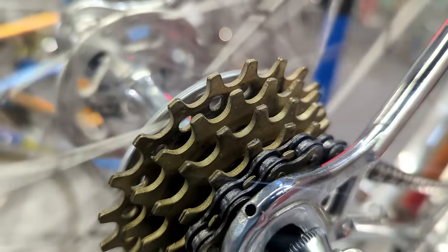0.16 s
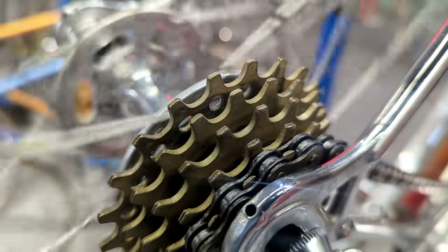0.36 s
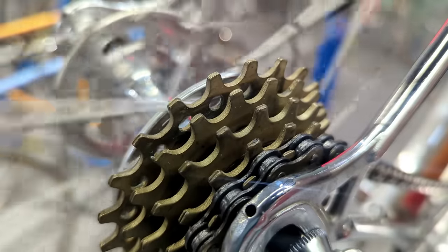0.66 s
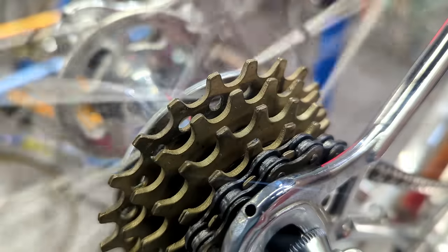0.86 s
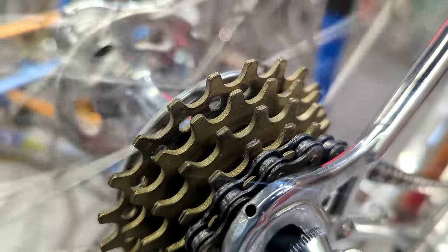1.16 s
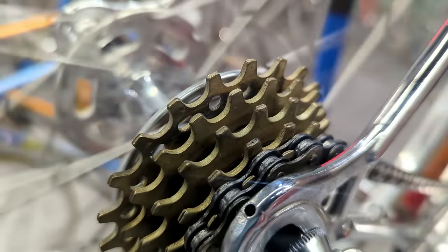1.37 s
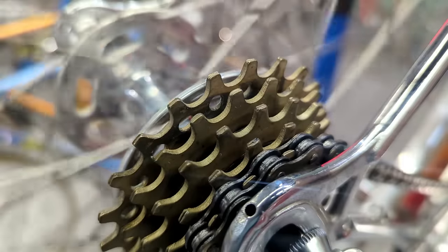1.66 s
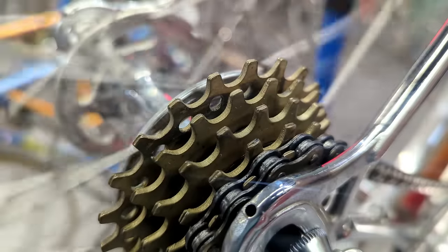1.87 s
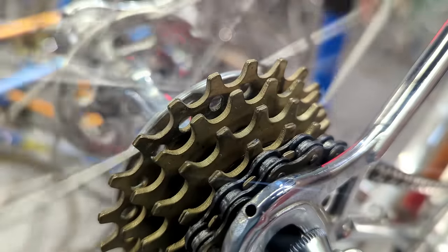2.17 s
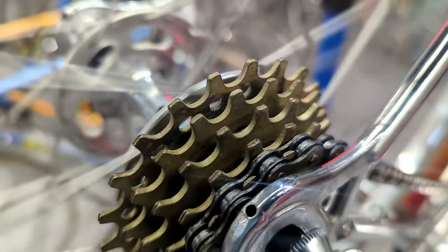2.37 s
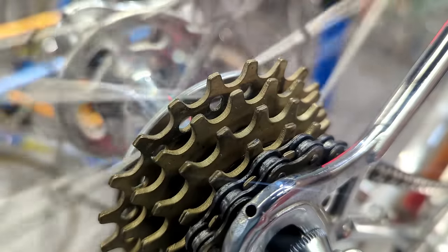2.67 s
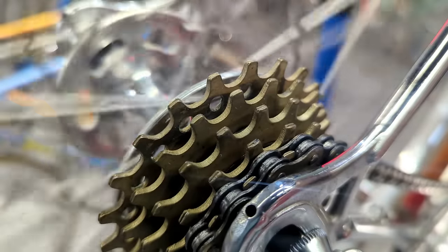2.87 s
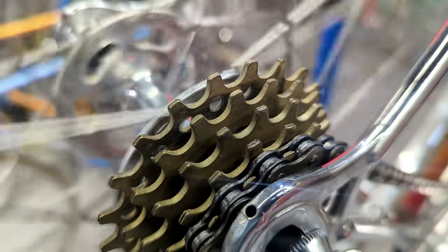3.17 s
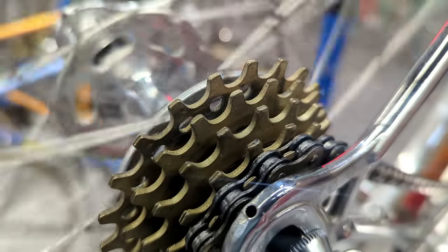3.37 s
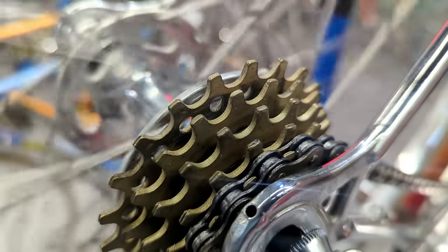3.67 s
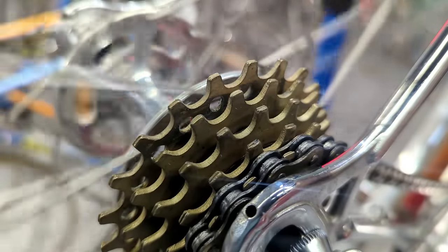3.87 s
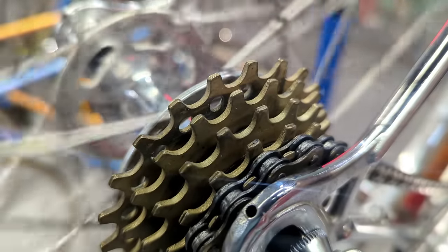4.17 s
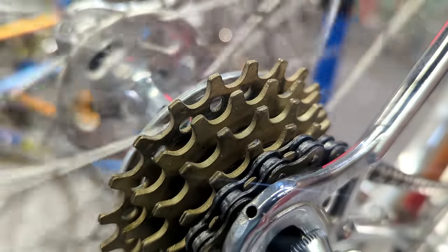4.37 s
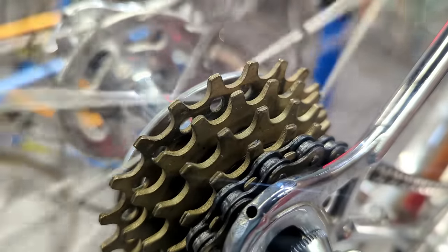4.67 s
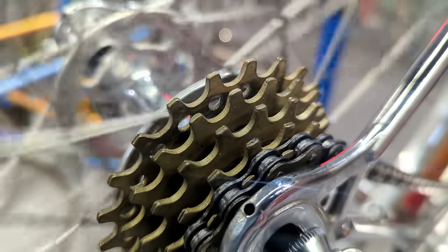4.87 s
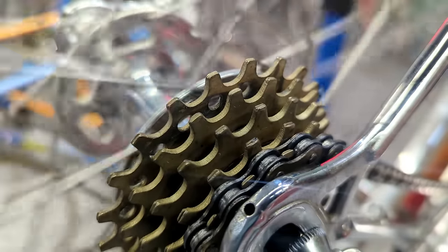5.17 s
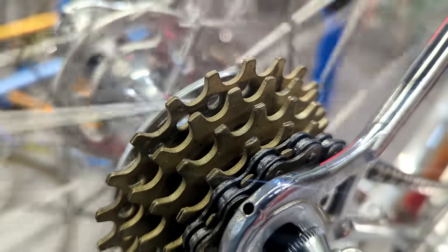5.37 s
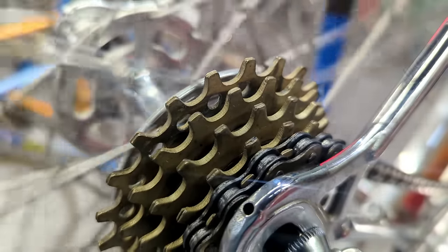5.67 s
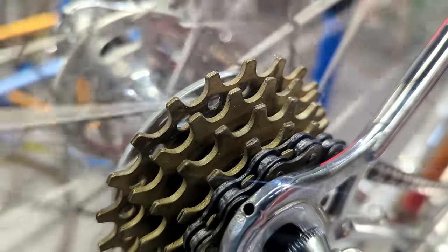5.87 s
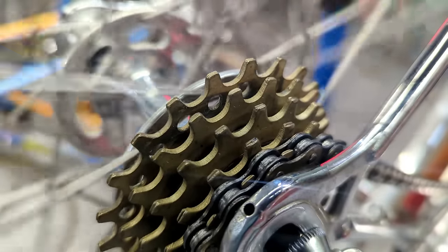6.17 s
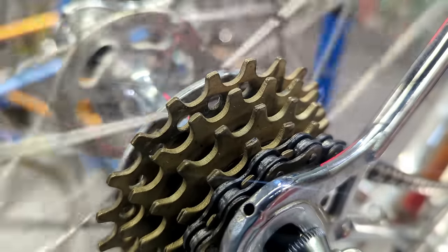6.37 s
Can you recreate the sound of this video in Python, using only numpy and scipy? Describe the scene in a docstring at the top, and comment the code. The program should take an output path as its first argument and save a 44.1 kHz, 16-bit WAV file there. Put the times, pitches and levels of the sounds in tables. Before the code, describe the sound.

A bicycle freewheel coasts very close to the microphone. Two pawls drop alternately on ratchet teeth, giving a rapid, slightly limping stream of thin, bright steel clicks, each with a tiny chatter and high sprocket ring. The rate eases steadily from start to finish. Soft bearing rustle and a hollow hub murmur lie underneath, with a short diffuse workshop echo and very faint low hum.

```python
"""Quick metallic ticking, close by, slows gently: a bicycle wheel coasts on a stand beside its listener.
Two pawls drop in turn off a 21-tooth ratchet; each lands, chatters and rings the steel sprockets.
Filtered noise makes the bearings' rustle and drives resonances of the hollow hub underneath.
The workshop adds a short diffuse echo, room air, a faint hum that comes and goes and a fainter drone."""
import sys
import numpy as np
from scipy import signal
from scipy.fft import rfft, irfft, next_fast_len
from scipy.io import wavfile
from scipy.ndimage import uniform_filter1d, map_coordinates

SR = 44100
rng = np.random.default_rng(int(sys.argv[2]) if len(sys.argv) > 2 else 0)


def unload_audio(sound):
    """Save the sound as a 16-bit wav file, at the path given as the first command line argument."""
    columns = np.transpose(np.atleast_2d(sound))
    # keep every value between -1 and 1, then stretch to whole-number steps
    steps = np.round(np.clip(columns, -1, 1) * 32767)
    wavfile.write(sys.argv[1], SR, steps.astype(np.int16))


N = 287179
TOOTH_COUNT = 21  # teeth in one turn


def amp(db):
    """Decibels to gain."""
    return 10 ** (np.asarray(db) / 20)


def unit(x):
    """Scale to rms 1."""
    return x / np.sqrt(np.mean(x ** 2) + 1e-20)


def along(points, hz):
    """(Hz, value) points read on a log frequency axis."""
    f, v = np.transpose(points)
    return np.interp(np.log(hz + 1), np.log(f + 1), v)


def curves(rows):
    """One value per sample for each column after the time."""
    time_s, *columns = np.transpose(rows)
    return [np.interp(np.arange(N) / SR, time_s, column) for column in columns]


def wobble(knots_per_s):
    """A smooth random curve through normally distributed knots."""
    knots = rng.standard_normal(int(N * knots_per_s / SR) + 4)
    coarse = np.linspace(0, N, 4000)
    smooth = map_coordinates(knots, [coarse * knots_per_s / SR])
    return np.interp(np.arange(N), coarse, smooth)


def filtered(x, response):
    """x times a response of frequency, zero-padded."""
    size = 2 * next_fast_len(N // 2 + SR // 4)
    spectrum = rfft(x, size) * response(np.fft.rfftfreq(size, 1 / SR))
    return irfft(spectrum, size)[..., :N]


def causal(gain):
    """The minimum-phase response with this gain: it rings only after a blow."""
    cepstrum = irfft(np.log(np.maximum(gain, 1e-6)))
    half = len(cepstrum) // 2
    fold = np.r_[1, np.full(half - 1, 2), 1, np.zeros(half - 1)]
    return np.exp(rfft(cepstrum * fold))


def noise():
    """White stereo noise; the shares of mid and side set the left-right likeness at each frequency."""
    # (frequency [Hz], left-right correlation [-1 to 1])
    likeness = [(60, 0.46), (150, 0.62), (300, 1), (600, -0.032), (1200, 0.2), (2500, -0.31), (5000, -0.26),
                (9000, -0.15), (14000, -0.11)]

    def angle(hz):
        """Mixing angle [rad] between mid and side."""
        return np.arccos(np.clip(along(likeness, hz), -1, 1)) / 2

    a, b = rng.standard_normal((2, N))
    mid = filtered(a, lambda hz: np.cos(angle(hz)))
    side = filtered(b, lambda hz: np.sin(angle(hz)))
    return np.array([mid + side, mid - side])


def body(x, spectrum):
    """Pass x through the broad colour of the metal."""
    return filtered(x, lambda hz: causal(amp(along(spectrum, hz))))


def ringing(drive, modes, vary_db):
    """Resonances fed by a noisy force; each wavers in strength and radiates in its own stereo pattern."""
    out = np.zeros((2, N))
    for f_hz, width_hz, db, pan_db, phase_rad in modes:
        force = drive * rng.standard_normal(N) * amp(vary_db * wobble(50))
        ring = signal.lfilter(*signal.iirpeak(f_hz, f_hz / width_hz, SR), force)
        quarter_turn = np.gradient(ring) / np.sin(2 * np.pi * f_hz / SR)
        for channel, side in enumerate((1, -1)):
            turned = np.cos(phase_rad / 2) * ring + side * np.sin(phase_rad / 2) * quarter_turn
            out[channel] += amp(db + side * pan_db / 2) * turned
    return out


def tone(hz, drift_hz):
    """A slightly unsteady sine of rms 1."""
    return unit(np.sin(2 * np.pi * np.cumsum(hz + drift_hz * wobble(3)) / SR))


def background():
    """Room air, a low hum that comes and goes and a fainter, slowly sinking drone above it."""
    # room air: (frequency [Hz], spectral level [dB])
    air_spectrum = [(20, -20), (40, -9), (58, -2), (100, -3), (180, -11), (400, -8.5), (2000, -47),
                    (15000, -50)]
    # swells of the hum: (start [s], length [s], level [dB])
    hum_swells = [(.3, .17, -70), (.7, .1, -72), (1.42, .19, -69.5), (2.15, .1, -73), (3.25, .35, -71),
                  (5.96, .6, -65)]
    # drone: (time [s], level [dB])
    drone_level = [(0, -86), (2.2, -87), (2.9, -74.5), (4.1, -81), (6.51, -83)]
    hum_rest_db, hum_waver_db, swell_fade_s = -83, 4, .12
    drone_start_hz, drone_sag_hz_per_s = 141, 1.2

    t = np.arange(N) / SR
    air = amp(-70.5) * unit(filtered(noise(), lambda hz: amp(along(air_spectrum, hz))))
    hum_gain = amp(hum_rest_db + hum_waver_db * wobble(6))
    for start_s, length_s, db in hum_swells:
        inside_s = np.minimum(t - start_s, start_s + length_s - t)
        swell = amp(db) * np.clip(.5 + inside_s / swell_fade_s, 0, 1)
        hum_gain = np.maximum(hum_gain, swell)
    hum = hum_gain * tone(hz=80, drift_hz=1.2)
    drone = amp(curves(drone_level)[0]) * tone(hz=drone_start_hz - drone_sag_hz_per_s * t, drift_hz=.6)
    return air + hum + drone


def workshop(x):
    """A short diffuse echo of decaying noise; the turning wheel keeps changing the paths that feed it."""
    # decay: (frequency [Hz], t60 [s])
    decay = [(200, 0.17), (3000, 0.3), (8000, 0.13), (16000, 0.11)]
    hop, length = SR // 8, SR // 3  # samples: a new echo pattern every hop
    starts = range(0, N, hop)
    hz, t, z = signal.stft(rng.standard_normal((len(starts), 2, length)), SR, nperseg=256)
    fading = z * amp(-60 * t / along(decay, hz)[:, None])
    tails = signal.istft(fading, SR, nperseg=256)[1][..., :length]
    tails = tails * (1 - np.exp(-np.arange(length) / SR / 0.001))  # 1 ms onset
    out = np.zeros((2, N + length))
    for start, tail in zip(starts, tails):
        echo = signal.fftconvolve(x[:, start:start + hop], tail / np.linalg.norm(tail[0]), axes=1)
        out[:, start:start + echo.shape[1]] += echo
    return out[:, :N]


def wheel_motion():
    """Drag slows the wheel: its speed (dB against the start) and the teeth passed, for every sample."""
    start_teeth_per_s, drag_per_s = 26.0, 0.05801  # drag: share of the speed lost per second
    speed = np.exp(-drag_per_s * np.arange(N) / SR)
    return 20 * np.log10(speed), start_teeth_per_s * (1 - speed) / drag_per_s


def bearings():
    """Rolling balls and sliding pawls rustle and sound the hollow hub, more softly as the wheel slows."""
    # balls and pawls rubbing: (frequency [Hz], spectral level [dB])
    rub_spectrum = [(60, -19), (250, -17.5), (600, -3), (1100, -4), (2500, 0), (5000, 3.5), (9000, 2.5),
                    (15700, -25.5)]
    # hub and frame: (frequency [Hz], width [Hz], level [dB], left-right [dB], left-right phase [rad])
    hub_modes = [(214, 17, -14, 7, 0.79), (282, 50, -9, -1, 0.73), (665, 85, -3, 5.5, 2.83),
                 (814, 74, 1, 1.5, 1.29)]
    # faint ring that the hub takes on as the wheel slows: (time [s], level [dB])
    hub_ring = [(0, -72), (5.2, -70), (6.51, -57)]
    rub_start_db, hub_start_db, db_per_speed_db = -43.5, -53.3, 1.6
    swell_db, swell_at_turn = 1.3, .94  # the hub swells once a turn: depth, place in the turn (0-1)

    speed_db, passed = wheel_motion()
    swell = swell_db * np.cos(2 * np.pi * (passed / TOOTH_COUNT - swell_at_turn))
    rub_db = rub_start_db + db_per_speed_db * speed_db
    hub_db = hub_start_db + db_per_speed_db * speed_db + swell
    roughness = amp(2.55 * wobble(120))
    rustle = unit(body(noise() * roughness, rub_spectrum)) * amp(rub_db)
    hollow = unit(ringing(roughness, hub_modes, vary_db=2.0)) * amp(hub_db)
    ring = unit(ringing(roughness, [(1455, 69, 0, 0, 1)], vary_db=3.0)) * amp(curves(hub_ring)[0])
    return rustle + hollow + ring


def teeth():
    """Blow dB and extra chime dB of each tooth of one turn; ordinary teeth have 0."""
    # teeth that stand out on every turn: (tooth number, blow [dB], extra chime [dB])
    odd_teeth = [(0, .5, 1.5), (4, 1, 1.5), (8, -1.4, -1.5), (10, .8, 0), (17, .5, 1.5), (19, -1.6, 0),
                 (20, 1.5, 6.5)]
    levels = np.zeros((TOOTH_COUNT, 2))
    for number, *db in odd_teeth:
        levels[number] = db
    return levels.T


def pawl(offset_teeth, tooth_db, chatter_db, chatter_s, scatter_db, crack_s):
    """Contact power of one pawl: a landing for every tooth, then a run of fading rebounds."""
    passed = wheel_motion()[1] - offset_teeth
    tooth = np.arange(np.ceil(passed[0]), passed[-1]).astype(int)
    landing_s = np.interp(tooth, passed, np.arange(N) / SR)
    blow = amp(tooth_db[tooth % TOOTH_COUNT] + scatter_db * rng.standard_normal(len(tooth)))
    shape = (len(tooth), 18)  # rebounds per landing
    delay_s = np.cumsum(0.00058 * rng.gamma(2, .5, shape), axis=1)
    settle_s = chatter_s * amp(2.4 * rng.standard_normal((len(tooth), 1)))
    rebound = amp(chatter_db + 3.5 * rng.standard_normal(shape)) * np.exp(-(delay_s / settle_s) ** 2)
    # the spring's energy is shared between the landing and its rebounds, none harder than the landing
    share = np.c_[np.ones(len(tooth)), np.minimum(rebound, 1)] ** 2
    power = blow[:, None] ** 2 * share / share.sum(axis=1, keepdims=True)
    when_s = landing_s[:, None] + np.c_[np.zeros(len(tooth)), delay_s]
    contacts = np.bincount((when_s * SR).astype(int).ravel(), power.ravel(), N)[:N]
    fade = np.exp(-1 / (crack_s * SR))
    return signal.lfilter([1 - fade], [1, -fade], contacts)


def recolour(x, patchy_db):
    """Each landing meets the tooth at a new spot, so its colour changes while its energy stays."""
    z = signal.stft(x, nperseg=128)[2]
    field = rng.standard_normal(z.shape[1:])
    field = uniform_filter1d(field, size=2, axis=0)  # over frequency
    field = uniform_filter1d(field, size=10, axis=1)  # over time
    shaded = z * amp(patchy_db * unit(field))
    shaded = shaded * np.linalg.norm(z, axis=(0, 1)) / (np.linalg.norm(shaded, axis=(0, 1)) + 1e-20)
    return signal.istft(shaded, nperseg=128)[1][:, :N]


def ratchet():
    """One pawl chatters on, the other snaps down harder and settles sooner; some teeth chime more."""
    # bare click of steel on steel: (frequency [Hz], spectral level [dB])
    click_spectrum = [(100, -43.5), (450, -33.5), (1000, -26.5), (1700, -19.5), (2050, -16), (2400, -17.5),
                      (3000, -16.5), (3700, -10), (5300, -9), (7000, -7.5), (10000, -2.5), (13500, -3.5),
                      (15700, -4.5)]
    # sprockets: (frequency [Hz], width [Hz], level [dB], left-right [dB], left-right phase [rad])
    sprocket_modes = [(5780, 100, -4, 0, .5), (6220, 120, -1, -2, 2), (6420, 110, -4, -3, 2.5),
                      (7490, 280, -1, 5, 1.5), (8600, 240, 3.5, 2, .8), (8780, 200, -2, 0, 1.2),
                      (9120, 150, -3, 5, 2.2), (10020, 260, -2, -1, 1), (10680, 180, -3, 0, -1.5),
                      (14700, 390, -1, 1, 1), (11050, 75, 7, 1, -1.2), (11265, 75, 4.5, 3, -1),
                      (11630, 110, 3, 2, -2.2), (11960, 300, -4, 2, .5)]
    clicks_db, chime_rms_db = -26.3, -42.5
    first_at, second_at = .542, .928  # teeth

    tooth_db, chime_db = teeth()
    first = pawl(first_at, tooth_db, chatter_db=-5, chatter_s=.0105, scatter_db=.4, crack_s=.0008)
    second = pawl(second_at, tooth_db + .3, chatter_db=-12, chatter_s=.009, scatter_db=.4, crack_s=.001)
    force = np.sqrt(np.abs(first + second))
    steel = body(force * noise(), click_spectrum) + ringing(force, sprocket_modes, vary_db=2)
    clicks = recolour(steel, patchy_db=1.7)
    tooth = np.floor(wheel_motion()[1] - first_at).astype(int) % TOOTH_COUNT
    # the purest ring of the sprockets
    chime = ringing(force * amp(chime_db[tooth]), [(12760, 60, 0, 1, 1.4)], vary_db=3)
    return unit(clicks) * amp(clicks_db) + unit(chime) * amp(chime_rms_db)


def scene():
    """The freewheel close by, slightly to the left, in its room."""
    wheel = ratchet() * amp([[.2], [-.2]]) + bearings()
    return wheel + amp(-6.5) * workshop(wheel) + background()


def record(dry):
    """A steep band limit: next to nothing passes above top_hz."""
    top_hz = 15880
    return filtered(dry, lambda hz: 1 / (1 + (hz / top_hz) ** 600))


dry = scene()
out = record(dry)
unload_audio(out)
```